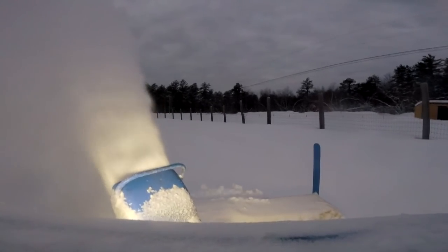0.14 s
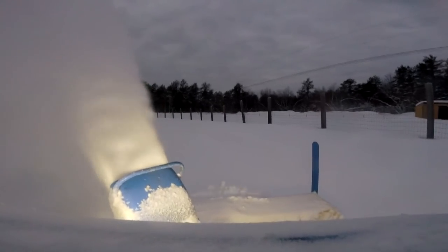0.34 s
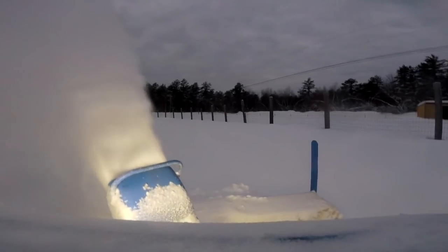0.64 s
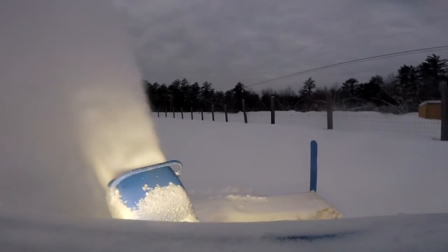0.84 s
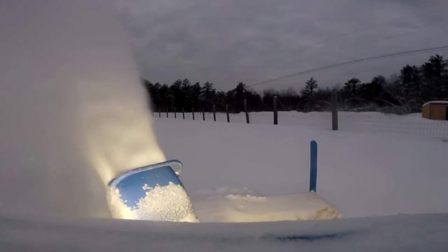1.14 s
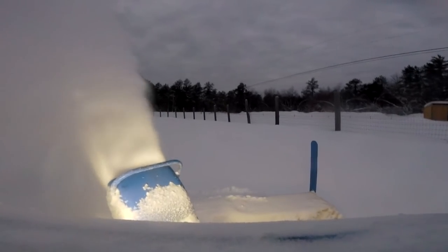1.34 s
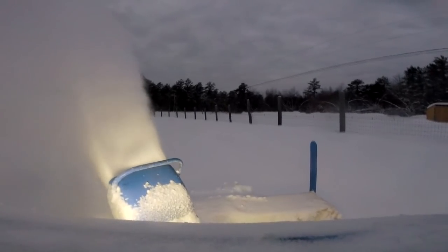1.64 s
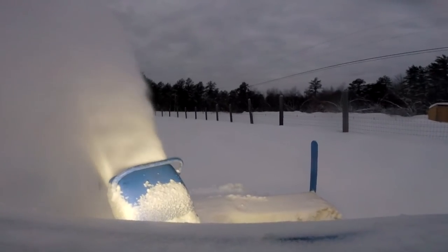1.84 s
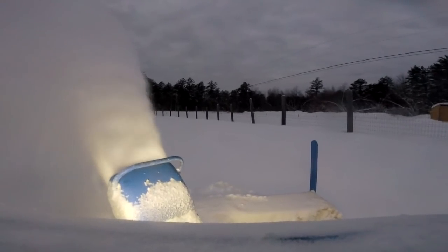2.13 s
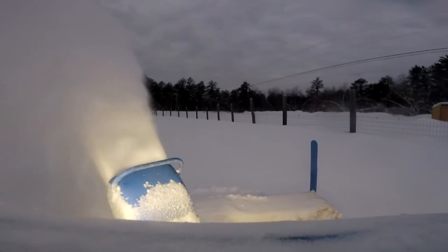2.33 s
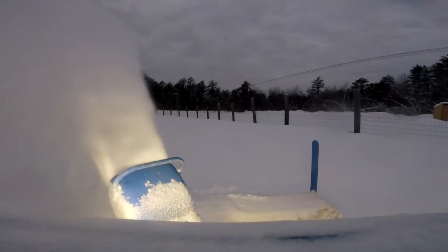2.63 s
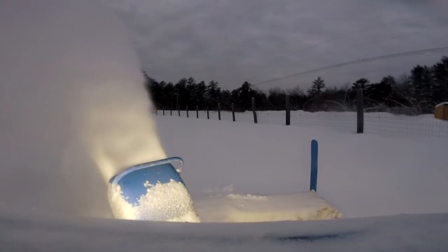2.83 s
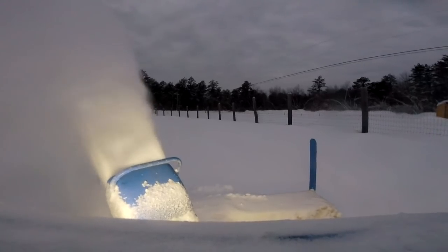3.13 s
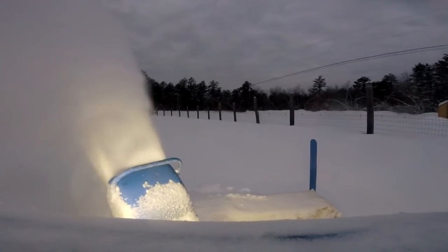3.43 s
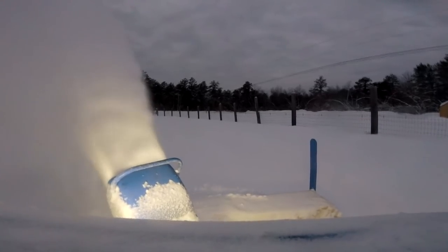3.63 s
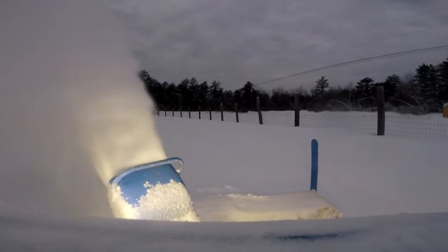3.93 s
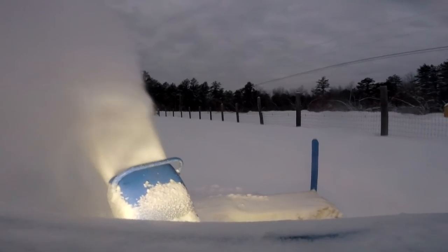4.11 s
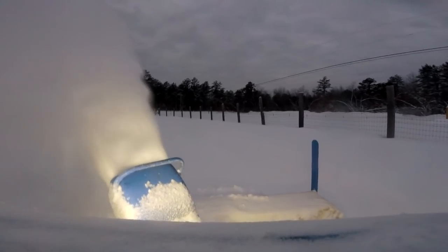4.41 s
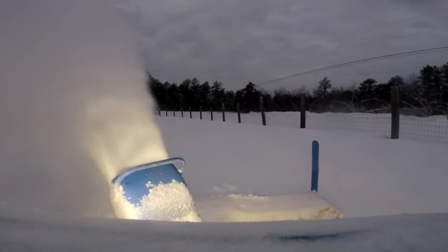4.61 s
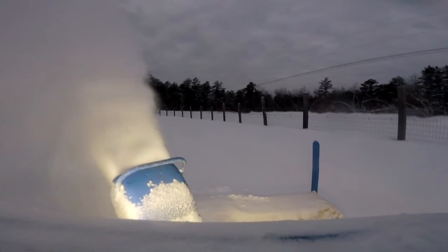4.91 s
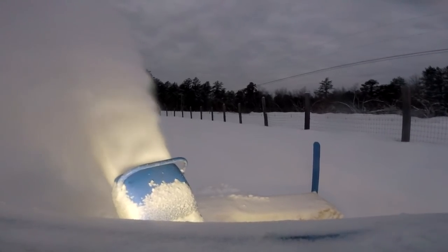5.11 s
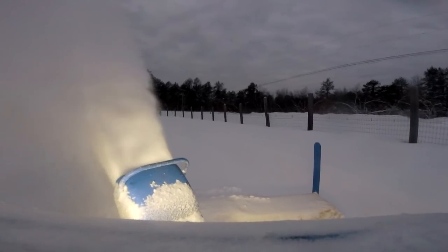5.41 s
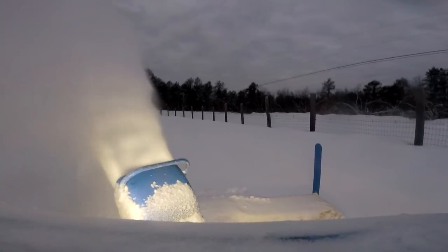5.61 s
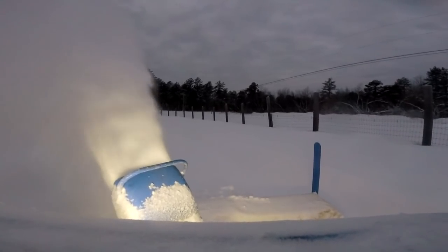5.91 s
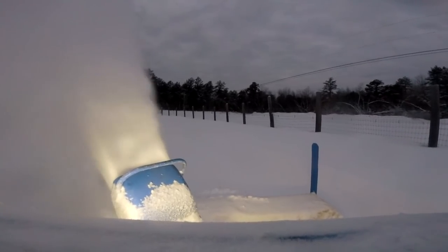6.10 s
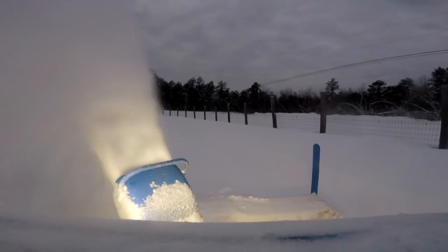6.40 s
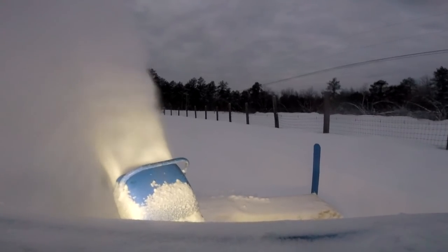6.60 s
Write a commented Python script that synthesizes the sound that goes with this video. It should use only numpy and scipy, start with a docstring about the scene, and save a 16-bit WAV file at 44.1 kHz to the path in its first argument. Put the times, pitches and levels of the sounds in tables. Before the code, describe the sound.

A small tractor engine drones steadily up close, driving a throbbing snowblower that roars and hisses as it throws snow.

```python
"""A small twin-cylinder tractor working a snowblower in an open field, microphone close up on the hood.
The exhaust drones on the orders of the engine cycle and the four impeller blades throb at their own
rate. Snow churns in the auger, roars in the housing and hisses out of the chute. Behind that, valves
clatter at fixed crank angles, a belt thrums, gears whine and the hood shakes.
A compressor after the microphone squeezes the peaks."""
import sys
import numpy as np
from scipy import signal
from scipy.fft import rfft, irfft, next_fast_len
from scipy.io import wavfile
from scipy.ndimage import uniform_filter1d, minimum_filter1d, map_coordinates

SR = 44100
rng = np.random.default_rng(int(sys.argv[2]) if len(sys.argv) > 2 else 0)


def log_audio(samples):
    """Write samples as a 16-bit WAV file to the path given in sys.argv[1]."""
    # one column per channel
    frames = np.atleast_2d(samples).T
    # limit to full scale, then quantise
    limited = np.clip(frames, -1, 1)
    pcm = np.round(limited * 32767).astype(np.int16)
    wavfile.write(sys.argv[1], SR, pcm)


N = 297675


def amp(db):
    return 10 ** (np.asarray(db) / 20)


def unit(x):
    return x / np.sqrt(np.mean(x ** 2) + 1e-20)


def curve(rows):
    """(t/s, value) points joined into one value per sample."""
    return np.interp(np.arange(N) / SR, *np.transpose(rows))


def wobble(rate):
    """A smooth random curve, rate knots a second."""
    steps = np.arange(0, N + 64, 64)
    knots = rng.standard_normal(int(N * rate / SR) + 4)
    return np.interp(np.arange(N), steps, map_coordinates(knots, [steps * rate / SR]))


def filtered(x, response):
    """x through a gain given as a function of frequency."""
    size = next_fast_len(N + 8192)
    return irfft(rfft(x, size) * response(np.fft.rfftfreq(size, 1 / SR)), size)[:N]


def coloured(x, points):
    """x through (f/Hz, level/dB) points on a log axis, rms 1."""
    f, db = np.transpose(points)
    response = lambda hz: amp(np.interp(np.log(hz + 1), np.log(f), db, left=-120, right=-120))
    return unit(filtered(x, response))


def ringing(x, modes):
    """x through (f/Hz, width/Hz, gain/dB) resonances, rms 1."""
    response = lambda hz: amp(sum(db / (1 + (2 * (hz - f) / width) ** 2) for f, width, db in modes))
    return unit(filtered(x, response))


def patchy(depth_db):
    """White noise with patches of random gain in time and frequency."""
    spectra = signal.stft(rng.standard_normal(N + 512), nperseg=512)[2]
    patches = uniform_filter1d(uniform_filter1d(rng.standard_normal(spectra.shape), 6, 0), 10, 1)
    return signal.istft(spectra * amp(depth_db * unit(patches)), nperseg=512)[1][:N]


def orders(turns, table, lag, waver_db, jitter):
    """Sines on multiples k of a shaft angle, lag(k) turns late; each wavers, all share one tremor."""
    turns = turns + jitter * wobble(12)
    return sum(np.sqrt(2) * amp(db + waver_db * wobble(5.9)) * np.cos(2 * np.pi * (k * turns - lag(k)))
               for k, db in table)


def auger():
    """Heavy bites of snow churn in the auger, each a rush that swells and fades."""
    # bites of snow: t/s, peak level/dB, half-width/s
    bites = [(.15, -47, .15), (1.45, -47, 0.084), (3.9, -48, 0.078), (4.9, -47.5, 0.17), (5.7, -48, .12)]
    # spectrum of the churning: f/Hz, level/dB
    churn = [(700, -20.5), (1000, -9), (1300, -2), (1600, 5), (2200, -23)]
    t = np.arange(N) / SR
    swell = sum(amp(db) * np.exp(-((t - at) / width) ** 2) for at, db, width in bites)
    return swell * coloured(patchy(depth_db=2.5), churn)


def hood(cycle):
    """The engine shakes the hood under the microphone: one waveform every cycle, wavering a little."""
    # hood vibration: order of the engine cycle, level/dB
    shake = [(20, -59), (23, -57), (24, -53), (25, -56), (27, -59), (29, -59), (30, -61), (33, -54),
             (35, -63), (36, -53), (37, -64), (38, -63), (43, -58), (44, -60), (45, -58), (48, -62),
             (49, -61), (50, -61), (52, -61), (53, -63), (54, -58), (56, -61), (57, -59), (58, -56),
             (61, -64), (63, -65), (64, -59), (65, -62), (70, -65), (72, -67), (73, -66), (75, -64),
             (76, -63), (78, -60), (79, -69), (81, -66), (83, -68), (84, -67), (87, -68), (89, -71)]
    order, db = np.transpose(shake)
    angle = np.linspace(0, 1, 4097)
    phase = rng.random((len(order), 1))
    one_cycle = np.sqrt(2) * amp(db) @ np.cos(2 * np.pi * (order[:, None] * angle + phase))
    return amp(1.5 * wobble(4)) * np.interp((cycle + .001 * wobble(12)) % 1, angle, one_cycle)


def drive_train(cycle):
    """The belt thrums on its loop rate, a gear pair whines and low hums sit under the blades."""
    # belt thrum: order of the belt loop, level/dB
    belt_orders = [(8, -48), (11, -50), (13, -48), (14, -45), (18, -48), (26, -51), (28, -55), (31, -55),
                   (32, -50), (33, -50), (37, -48), (38, -50), (51, -52), (53, -48), (55, -53), (56, -54)]
    # gear whine, with side tones one order apart: order of the engine cycle, level/dB
    gear_orders = [(34.35, -60), (68.72, -65), (69.72, -59), (70.72, -55.5), (71.72, -63)]
    # low hums, mostly beats of engine and blades: order of the engine cycle, level/dB
    hum_orders = [(.823, -53), (1.177, -53), (1.823, -52), (2.85, -44), (6.823, -50)]
    loops_per_cycle = .2005
    lag = lambda k: .37 * k ** 2
    belt = orders(loops_per_cycle * cycle, belt_orders, lag, waver_db=1.5, jitter=.001)
    whine = orders(cycle, gear_orders, lag, waver_db=1.5, jitter=.0007)
    hum = orders(cycle, hum_orders, lag, waver_db=2, jitter=.004)
    return belt + whine + hum


def valves(cycle):
    """Each valve-train contact starts a short dying burst, its size and timing new in every cycle."""
    # contacts: share of the cycle, knock level/dB, tick level/dB, crack level/dB
    contacts = [(.155, 5, -15, -6), (.23, 4, -20, -8), (.285, 4, -1, -7), (.33, 3.5, -12, 0),
                (.43, 4, -14, -18), (.52, 2.5, -15, -18), (.655, 2.5, -9, -9), (.705, 1, -10, -12),
                (.78, 1, -17, -4)]
    # spectra of a contact's knock, high tick and sharp crack: f/Hz, level/dB
    knock_colour = [(1200, -21.5), (1900, 3.5), (2430, 1.5), (3300, -4), (4500, -20), (5500, -9.5),
                    (7000, -11), (8500, -22), (11000, -52)]
    tick_colour = [(6500, -20), (8300, -7), (9300, -3), (10500, -9), (11500, -20), (13000, -28),
                   (14300, -37)]
    crack_colour = [(2600, -20), (3400, 1), (4300, 0), (5200, -7), (7000, -5), (8000, -26.5)]
    # cover plates that ring after a knock: f/Hz, width/Hz, gain/dB
    covers = [(2421, 120, 12.5), (2810, 160, 9), (3500, 160, 4), (5460, 200, 9.5)]
    angle, knock_db, tick_db, crack_db = np.transpose(contacts)
    whole_cycles = np.arange(int(cycle[-1]))[:, None]
    scatter = rng.standard_normal((len(whole_cycles), 4, len(angle)))
    strike_angles = whole_cycles + angle + .006 * scatter[:, 0]
    onsets = np.interp(strike_angles, cycle, np.arange(N)).astype(int).ravel()
    t = np.arange(SR // 25) / SR

    def bursts(db, colour, rise_s, t60_s):
        shape = (1 - np.exp(-t / rise_s)) * amp(-60 * t / t60_s)
        envelope = signal.fftconvolve(np.bincount(onsets, amp(db).ravel(), N), shape)[:N]
        return coloured(envelope * rng.standard_normal(N), colour)

    knock = bursts(knock_db + scatter[:, 1], knock_colour, rise_s=.00078, t60_s=.014)
    tick = bursts(tick_db + 1.2 * scatter[:, 2], tick_colour, rise_s=.0002, t60_s=.005)
    crack = bursts(crack_db + 1.2 * scatter[:, 3], crack_colour, rise_s=.0004, t60_s=.008)
    return amp(-52) * ringing(knock, covers) + amp(-73) * tick + amp(-63) * crack


def snow(cycle):
    """Snow booms and roars in the housing and hisses out of the chute, pulsing with the engine."""
    # snow feed, driving roar and hiss together: t/s, level/dB
    feed = [(0, -28.5), (.6, -30.5), (1.2, -30), (1.45, -28.5), (1.75, -29.5), (3, -29.5), (3.6, -29),
            (4.9, -29.5), (5.45, -30), (5.7, -30), (6.75, -29.5)]
    # rise and fall of the boom: t/s, level/dB
    boom_level = [(0, -35.5), (1.1, -34.5), (2.3, -35), (3.05, -46), (3.4, -35.5), (4.4, -47), (4.9, -42),
                  (5.6, -53), (6.1, -35.5), (6.75, -48)]
    # spectra of the boom, the roar and the hiss: f/Hz, level/dB
    boom_colour = [(100, -22), (135, -18), (160, -7.5), (185, -12), (230, -10)]
    roar_colour = [(15, -15), (30, -19), (60, -3.5), (80, -3), (105, -5.5), (200, -10), (260, -3.5),
                   (400, -8), (480, -13), (700, -14.5), (880, -15.5), (1300, -15.5), (1900, -22.5),
                   (2600, -37), (4000, -46.5)]
    hiss_colour = [(1200, -19.5), (2200, 0), (3300, -1.5), (3900, -10), (4600, -12.5), (5450, -6.5),
                   (6500, -8), (7700, -14.5), (8600, -19.5), (9400, -21.5), (10600, -33), (11700, -38.5),
                   (13200, -54.5), (14300, -59)]
    # resonances and hollows of the sheet-metal housing and hood: f/Hz, width/Hz, gain/dB
    panels = [(210, 40, -5), (285, 25, -2), (365, 70, 5.5), (420, 50, -2), (568, 100, 11), (655, 40, -2),
              (920, 110, -2), (1750, 70, -3), (790, 45, 4), (1080, 200, 3), (1670, 70, 5), (1850, 40, 1)]
    split_hz, hiss_under_db = 900, 22.5
    feed_db = curve(feed)
    firing = amp(1.2 * np.cos(4 * np.pi * (cycle - .23)))  # the upper roar swells at each firing
    swell_db = .6 * np.cos(2 * np.pi * (cycle - .48))  # the hiss swells once a cycle
    low, high = rng.standard_normal((2, N))
    rush = filtered(low, lambda hz: hz < split_hz) + filtered(firing * high, lambda hz: hz >= split_hz)
    boom = amp(curve(boom_level)) * coloured(rng.standard_normal(N), boom_colour)
    roar = amp(feed_db) * ringing(coloured(rush, roar_colour), panels)
    hiss = amp(feed_db + swell_db - hiss_under_db) * coloured(patchy(depth_db=.5), hiss_colour)
    return boom + roar + hiss


def impeller(cycle):
    """Belted to the engine, each blade flings its load of snow past the chute mouth."""
    # blade throb, half orders from unequal blades: order of the blade rate, level/dB
    throb = [(.5, -55), (1, -29.4), (1.5, -50), (2, -37.5), (2.5, -47), (3, -39.5), (3.5, -51), (4, -40.5),
             (5, -48), (6, -51), (7, -52.5), (8, -54), (9, -56)]
    blades_per_cycle = 3.17697
    blade_passes = blades_per_cycle * cycle - .035
    lag = lambda k: .26 * k - .062 * (k - 1) * (k - 2)
    return orders(blade_passes, throb, lag, waver_db=.9, jitter=.004)


def exhaust(cycle):
    """Two cylinders fire into the muffler, which scatters the phases of their orders."""
    # exhaust drone: order of the engine cycle, level/dB
    drone = [(1, -46.3), (2, -26.2), (3, -36), (4, -35.4), (5, -51.7), (6, -44.7), (7, -37.5), (8, -47.0),
             (9, -51.9), (10, -39.2), (11, -53.2), (12, -47.9), (13, -50.0), (14, -45.9), (15, -40.6),
             (16, -40.6), (17, -47.9), (18, -44.7), (19, -50.5)]
    # orders that thin out while the engine gains speed: order, loss/(dB per s)
    fading = {7: 1.1, 16: 1.5}
    from_middle_s = (np.arange(N) - N / 2) / SR
    levels = [(k, db - fading[k] * from_middle_s if k in fading else db) for k, db in drone]
    lag = lambda k: .225 * k ** 2 + .575 * k - .41
    return orders(cycle, levels, lag, waver_db=.6, jitter=.0015)


def scene():
    """The whole machine as heard on the hood, in mono, its moving parts timed by one crank angle."""
    # engine cycle rate, creeping up and hunting a little: t/s, f/Hz
    speed = [(0.0, 23.477), (0.4, 23.463), (0.79, 23.474), (1.19, 23.523), (1.59, 23.605), (1.99, 23.579),
             (2.38, 23.634), (2.78, 23.688), (3.18, 23.728), (3.57, 23.72), (3.97, 23.787), (4.37, 23.743),
             (4.76, 23.73), (5.16, 23.735), (5.56, 23.758), (5.96, 23.801), (6.35, 23.737), (6.75, 23.836)]
    cycle = np.cumsum(curve(speed)) / SR - .003  # crank angle, counted in engine cycles
    machine = exhaust(cycle) + hood(cycle) + impeller(cycle) + drive_train(cycle) + valves(cycle)
    return (machine + auger() + snow(cycle))[None]


def record(dry):
    """The microphone chain: a compressor squeezes the bass-heavy peaks, then the top treble is cut."""
    threshold, squeeze, window_samples = .18, .55, 1100
    makeup_db, top_hz, dc_offset = 1, 14250, -.0016
    wanted_gain = np.minimum(1, threshold / (np.abs(dry[0]) + 1e-9)) ** squeeze
    gain = uniform_filter1d(minimum_filter1d(wanted_gain, window_samples), window_samples)
    return filtered(dry[0] * gain * amp(makeup_db), lambda hz: hz < top_hz)[None] + dc_offset


dry = scene()
out = record(dry)
log_audio(out)
```